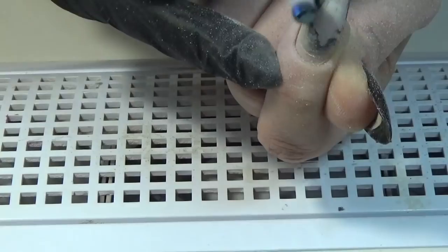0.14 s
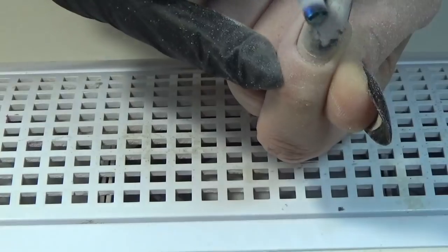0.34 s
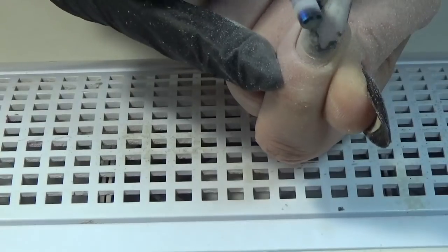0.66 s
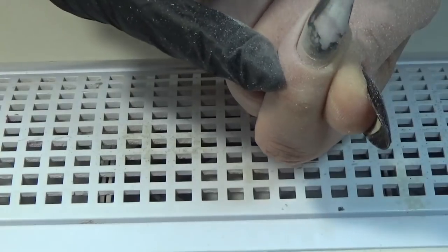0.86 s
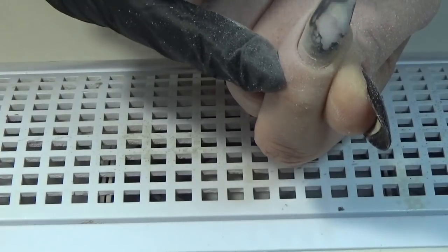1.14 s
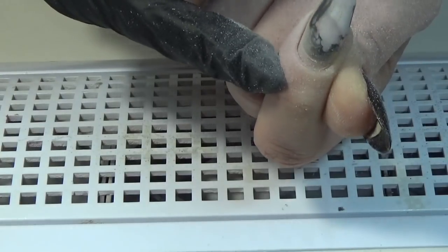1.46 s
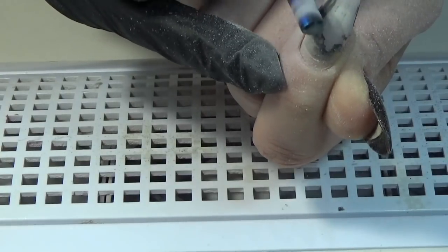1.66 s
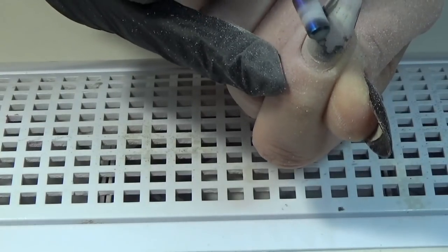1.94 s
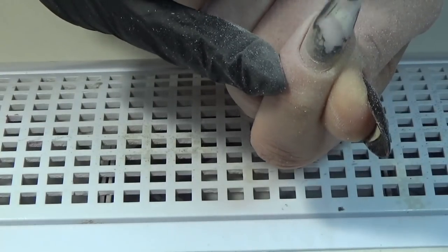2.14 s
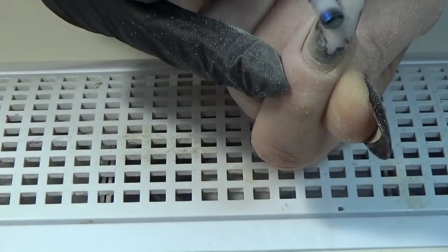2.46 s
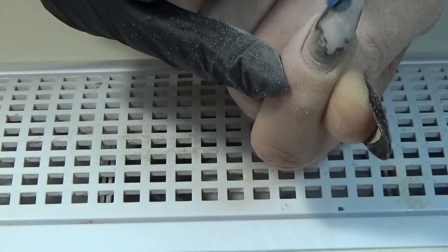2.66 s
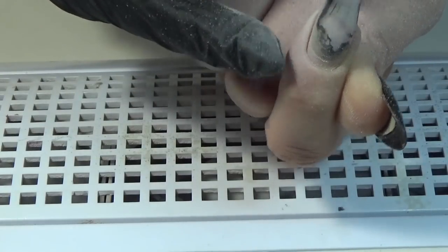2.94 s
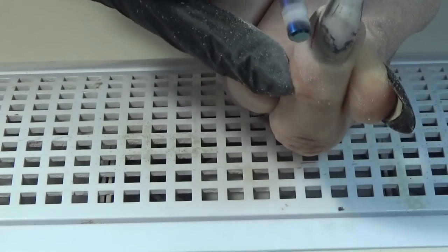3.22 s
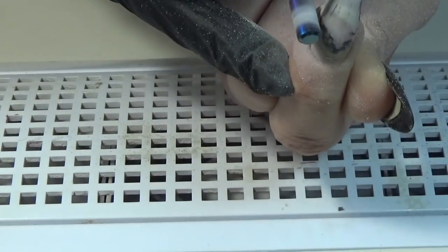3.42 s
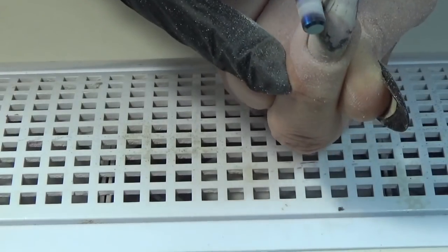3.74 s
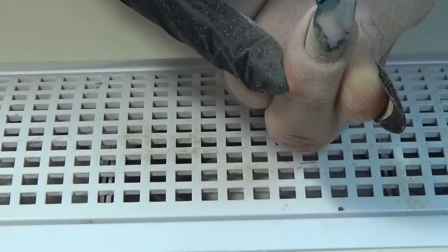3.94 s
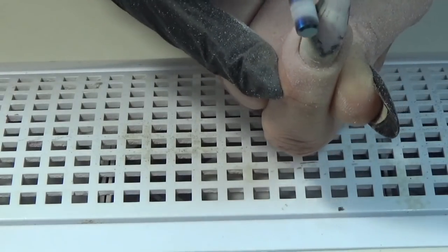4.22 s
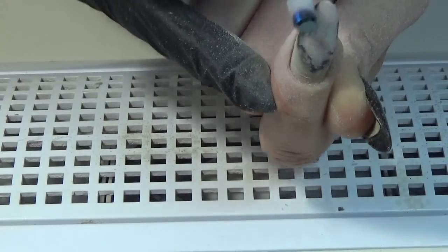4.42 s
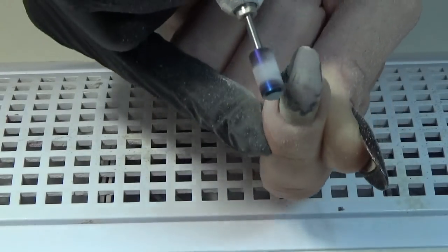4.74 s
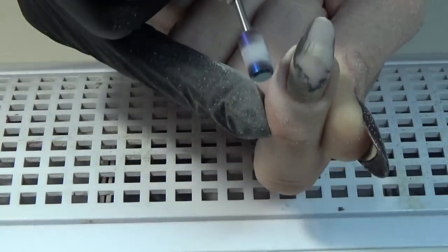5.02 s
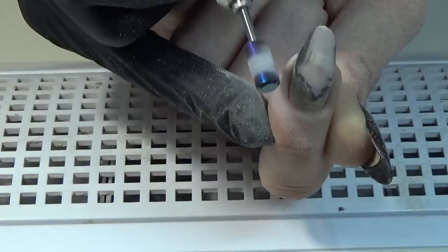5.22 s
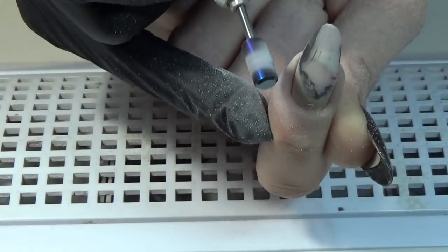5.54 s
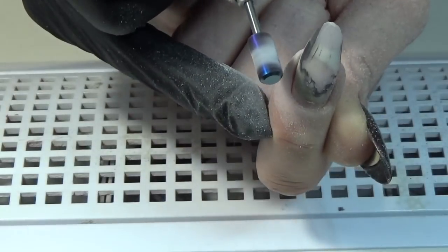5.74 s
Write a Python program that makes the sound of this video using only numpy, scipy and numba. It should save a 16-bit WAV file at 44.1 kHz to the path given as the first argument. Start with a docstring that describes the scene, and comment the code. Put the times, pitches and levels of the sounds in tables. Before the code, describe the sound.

A handheld nail drill runs continuously near the microphone, with a piercing whine around five to six kilohertz and sizzling bearing noise. Quick gritty buzzes come and go as the bit touches the nail, each pulling the pitch down and dulling the whine. After the last light touches only free-running whine and hiss remain, over constant fan air in a small, dry indoor space.

```python
"""A piercing whine and a bright hiss, broken by short buzzing strokes: an electric nail drill close to the
microphone, turning about 550 times a second above a small dust extractor.
The motor whines at ten times the shaft rate; the bearings hiss through the resonances of the handpiece.
In each stroke the bit bites the nail once a turn and drags the motor down; later the drill is lifted, turns
away and speeds up. The recorder's gain control ducks under the hardest strokes."""
import sys
import numpy as np
from scipy import signal
from scipy.fft import rfft, irfft
from scipy.io import wavfile
from scipy.ndimage import uniform_filter1d
from numba import njit

SR = 44100
rng = np.random.default_rng(int(sys.argv[2]) if len(sys.argv) > 2 else 0)


def to_wav(sig):
    """Store sig (one row per channel, or 1-D mono) as 16-bit WAV at the path in sys.argv[1].

    Samples outside -1..1 are clipped; the rate is SR.
    """
    pcm = np.clip(np.atleast_2d(sig), -1, 1) * 32767
    pcm = np.round(pcm).astype(np.int16)
    wavfile.write(sys.argv[1], SR, pcm.T)  # frames by channels


N = 258867
TIME = np.arange(N) / SR  # s
FREQS = np.maximum(np.fft.rfftfreq(N, 1 / SR), 1)  # Hz, kept above zero for logarithms and division

# Air rushing through the extractor, below the drill: f/Hz, relative density level/dB
AIR_SPECTRUM = [(25, -33), (70, -28), (115, -14), (165, -7), (195, -10.5), (290, 1), (420, -8), (620, -8),
                (1000, -5), (1200, -6), (1400, -10), (2300, -10.5), (5000, -11), (11000, -24)]
# Resonances of the extractor's box and grille: f/Hz, width/Hz, relative level/dB
BOX_RESONANCES = [(500, 72, -4), (750, 24, -1.5), (970, 34, -11.5), (1077, 97, -6)]
# Hum of the fan motor and blades: f/Hz, level/dB
FAN_LINES = [(48.4, -68.5), (339.1, -45.5), (376.8, -51.5), (753.7, -56.5), (1550, -48.5), (1599, -54)]
# Difference between the sides, from reflections around the microphone: f/Hz, side-minus-mid level/dB
STEREO_WIDTH = [(60, -10), (110, -13), (190, -17.5), (340, -16), (600, -12), (1060, -11), (1900, -10.5),
                (3350, -11.5), (6000, -14.5), (10600, -11.5)]
# Resonances of the handpiece held at the nail: f/Hz, width/Hz, relative level/dB
CASE_AT_NAIL = [(1763, 340, -6), (2905, 630, -2), (3260, 210, -3.5), (4426, 540, 2.5), (5520, 400, 5.5),
                (6400, 550, 1), (7790, 970, 1.5), (9520, 740, -6), (10790, 153, -2)]
# Resonances of the handpiece turned away: f/Hz, width/Hz, relative level/dB
CASE_TURNED = [(1797.6, 343, -6.5), (2715, 394, 0), (3490, 260, -0.5), (4120, 1000, -3), (5000, 410, 6.5),
               (6160, 780, 3), (7940, 1160, 0.5), (9850, 1400, -6.5), (10200, 770, -10)]
# Hold of the handpiece, at the nail and then lifted:
# t/s, turned away from the nail (0-1), bearing hiss level/dB, second whistle level/dB
HOLD = [(0, 0.03, -21.8, -34), (2.9, 0.13, -21.9, -39), (3.23, 0.06, -21.2, -29), (3.5, 0.03, -21.8, -34),
        (4.5, 0.1, -21.1, -33), (4.68, 1, -20, -35), (4.88, 0.95, -20, -33), (5.35, 1, -20, -53),
        (5.7, 0.83, -19.5, -29), (5.87, 0.6, -19, -31)]
# Hum of the shaft: t/s, level/dB
SHAFT_HUM = [(0, -35), (.4, -43), (1.1, -38), (1.3, -43.5), (1.55, -36.5), (2.0, -40), (2.75, -36.5),
             (3.1, -42), (3.6, -39.5), (3.8, -50), (4.15, -41.5), (5.15, -45), (5.5, -39.5)]
# Overtones of the motor: multiple of the shaft rate, level/dB at the nail, level/dB turned away
OVERTONES = [(3, -50.5, -43), (4, -49.5, -44.5), (5, -42.5, -44), (6, -54, -42.5), (7, -43, -35.5),
             (8, -41, -43), (9, -52, -33), (12, -40, -39), (13, -40, -36), (18, -48, -51)]
# Brief fades and swells of the whine as the tool moves: peak t/s, half-width/s, change of level/dB
WHINE_SWINGS = [(1.235, .045, -8), (2.56, .3, -1.8), (4.59, .045, -19), (4.89, .06, 3.2), (5.11, .125, -16),
                (5.75, .15, -12.5)]
# Strokes of the bit on the nail: start t/s, hardest t/s, end t/s, drag on the motor/Hz,
# buzz level/dB, buzz tilt/(dB per octave), top-octave shriek level/dB
STROKES = [(-0.1, 0.029, 0.112, 67.3, -32.5, 0.0, -17.0), (0.303, 0.433, 0.566, 109.5, -28.0, -2.0, -14.5),
           (0.721, 0.806, 0.918, 104.5, -27.5, 0.0, -13.5),
           (1.075, 1.147, 1.278, 142.0, -26.0, -2.0, -12.5),
           (1.403, 1.443, 1.511, 105.7, -28.0, -1.0, -13.5),
           (1.916, 2.112, 2.262, 101.7, -25.5, -2.5, -10.5), (2.436, 2.546, 2.675, 92.8, -24.5, 1.0, -12.0),
           (2.794, 2.815, 2.88, 54.3, -27.5, 4.0, -14.0), (3.583, 3.893, 4.041, 97.4, -35.0, -4.0, -19.0),
           (4.229, 4.323, 4.418, 99.4, -33.0, -4.0, -22.0), (4.514, 4.602, 4.737, 32.9, -44.0, -3.0, -30.0)]
# Ring of bit and nail under the bites: f/Hz, relative level/dB
NAIL_RING = [(550, -18), (2200, -27), (3300, -15), (3850, -6), (4400, -4.5), (5000, -18), (5500, -3),
             (6000, -3), (6600, 2), (7150, 1), (7700, -23), (8250, 0.5), (9300, -1), (9850, -1),
             (10400, -2.5), (11000, -6)]

AIR_DB = -29.5
FREE_HZ, START_HZ = 576.4, 546.9  # shaft rate when running free, and at the start
INERTIA_S = 0.556  # time constant with which the motor follows a change of load
WHINE_DB = -16.5  # whine when running free at the nail
WHINE_DB_PER_HZ = 0.135  # loss for each Hz that the motor slows
WHINE_TURNED_DB = -2.4  # change with the tool turned fully away
WHISTLE_DAMPED_DB = 5  # a full press on the nail damps the second whistle by this much
BITE_POWER = 1.4  # the buzz grows faster than the pressure
SHRIEK_LAG_S = 0.018  # the highest sounds of a stroke peak this much later
TOP_HZ = 11130  # upper limit of the recorder's band


def undb(db):
    """Decibels to gain."""
    return 10 ** (np.asarray(db) / 20)


def unit(x):
    """Scale to rms 1."""
    return x / np.sqrt(np.mean(x ** 2))


def curves(table):
    """The columns of a time table, interpolated at every sample."""
    times, *columns = np.transpose(table)
    return [np.interp(TIME, times, column) for column in columns]


def colour(points, hz):
    """Gain of a spectrum of (Hz, dB) points, interpolated over log frequency."""
    f, db = np.transpose(points)
    return undb(np.interp(np.log(hz), np.log(f), db))


def resonances(modes):
    """Gain of a set of steep-sided resonances whose powers add."""
    power = 0
    for hz, width, db in modes:
        detuning = (FREQS ** 2 - hz ** 2) / (FREQS * width * np.pi / 2)
        power = power + (undb(db) / (1 + detuning ** 2)) ** 2
    return np.sqrt(power)


def walk(rate):
    """Smooth random wander of rms 1 that changes about rate times a second."""
    spectrum = rfft(rng.standard_normal(N)) / (1 + (FREQS / rate) ** 4)
    return unit(irfft(spectrum, N))


def pan(db):
    """Left and right gains for a left-minus-right level."""
    return undb(np.array([[.5], [-.5]]) * db)


def noise(direct, reflected):
    """Stereo noise from two spectra: the direct sound, and reflections that make the sides differ."""
    mid, side = rfft(rng.standard_normal((2, N)))
    mid = mid * direct
    side = side * reflected * colour(STEREO_WIDTH, FREQS)
    return unit(irfft(np.array([mid + side, mid - side]), N))


def tone(phase, waver_db, waver_hz, side_db):
    """A stereo line whose level wavers, with a weak reflection that drifts between the sides."""
    direct = undb(waver_db * walk(waver_hz)) * np.sin(phase)
    reflected = undb(side_db) * np.sin(phase + np.pi * walk(2.4))
    return np.sqrt(2) * (direct + reflected * np.array([[1], [-1]]))


def extractor():
    """Nearly steady air noise shaped by the box and grille, with the wavering hum of the fan."""
    spectrum = np.hypot(colour(AIR_SPECTRUM, FREQS), resonances(BOX_RESONANCES))
    hum = 0
    for hz, db in FAN_LINES:
        phase = 2 * np.pi * hz * TIME + .4 * walk(4.8)
        hum = hum + undb(db) * tone(phase, waver_db=2, waver_hz=3.4, side_db=-26)
    return undb(AIR_DB + 0.81 * walk(18)) * noise(spectrum, spectrum) + hum


def pressure(stroke, lag_s=0):
    """One stroke, 0-1: the hand presses up to its hardest moment and eases off."""
    return np.interp(TIME - lag_s, stroke[:3], [0, 1, 0])


def press(levels_db, lag_s):
    """Gain of the sound of all strokes, each rising with pressure to its own level."""
    return sum(undb(db) * pressure(stroke, lag_s) ** BITE_POWER for stroke, db in zip(STROKES, levels_db))


def speed():
    """Turns a second: each stroke drags the motor down, and it creeps back towards its free speed."""
    drag_hz = sum(stroke[3] * pressure(stroke) for stroke in STROKES)
    step = 1 / (INERTIA_S * SR)
    sag_hz, _ = signal.lfilter([step], [1, step - 1], drag_hz, zi=[FREE_HZ - START_HZ])
    return FREE_HZ - sag_hz


def bearings(shaft, turned, hiss_db):
    """Rolling hiss rings the handpiece and swells twice a turn; turning the tool shows other resonances."""
    front, back = resonances(CASE_AT_NAIL), resonances(CASE_TURNED)
    all_round = np.sqrt((front ** 2 + back ** 2) / 2)  # the room hears the tool from every side
    at_nail = noise(front, all_round) * pan(.2)
    away = noise(back, all_round) * pan(0.44)
    hiss = np.sqrt(1 - turned) * at_nail + np.sqrt(turned) * away
    swell = 1 + 0.25 * np.sin(2 * shaft + 1.7 * walk(49))
    flutter_db = 0.47 * walk(27) + 0.63 * walk(300)
    return undb(hiss_db + flutter_db) * swell * hiss


def whine_level(hz, turned):
    """In dB: the whine weakens as the motor slows or turns away, and now and then fades or swells."""
    swings_db = sum(db * np.exp(-((TIME - peak_s) / width_s) ** 2) for peak_s, width_s, db in WHINE_SWINGS)
    return WHINE_DB - WHINE_DB_PER_HZ * (FREE_HZ - hz) + WHINE_TURNED_DB * turned + swings_db


def motor(shaft, hz, turned, whistle_db):
    """Lines locked to the shaft: its hum, a tenfold whine roughened by bearing play, a whistle, overtones."""
    rough_phase = 10 * shaft + .09 * walk(170)
    whine_db = whine_level(hz, turned) + 0.35 * walk(150)
    whine = undb(whine_db) * tone(rough_phase, waver_db=0.94, waver_hz=21, side_db=-22)
    out = whine * pan(2.6 * turned - .1)  # turning the tool aims the whine to the left

    hum_db, = curves(SHAFT_HUM)
    out += undb(hum_db) * tone(shaft, waver_db=1.55, waver_hz=11, side_db=-13.5)

    damped_db = WHISTLE_DAMPED_DB * sum(pressure(stroke) for stroke in STROKES)
    whistle_phase = 14 * shaft + 0.23 * walk(60)
    out += undb(whistle_db - damped_db) * tone(whistle_phase, waver_db=2.7, waver_hz=22, side_db=-25)

    for multiple, at_nail_db, away_db in OVERTONES:
        db = at_nail_db + turned * (away_db - at_nail_db)
        phase = round(multiple) * shaft + 0.39 * walk(30)
        out += undb(db) * tone(phase, waver_db=3.0, waver_hz=22, side_db=-22)
    return out


def sanding(shaft, hz):
    """The bit bites once a turn: shaft harmonics ring the nail, tilted stroke by stroke, under a shriek."""
    _, hardest_s, _, _, buzz_db, tilt_db, shriek_db = np.transpose(STROKES)
    early, late = press(buzz_db, 0), press(buzz_db, SHRIEK_LAG_S)
    tilt_db = np.interp(TIME, hardest_s, tilt_db)
    bite = shaft + 0.015 * walk(84)  # each bite lands slightly early or late
    buzz = 0
    for k in range(1, 21):
        octaves = np.clip(np.log2(k * hz / 7000), -.5, 1)  # the tilt pivots at 7 kHz
        lateness = np.clip(octaves / 0.68, 0, 1)  # the highest harmonics peak last
        force = early + lateness * (late - early)
        level = force * colour(NAIL_RING, k * hz) * undb(tilt_db * octaves + 3 * walk(20))
        smear = 2 * np.pi * rng.random()  # the ringing nail spreads each bite over the whole turn
        buzz = buzz + level * np.cos(k * bite + smear)
    # the grit shrieks above the recorder's band, where it still works the gain control
    top_octave = np.exp(-((FREQS - 15000) / 1500) ** 2)
    shriek = press(shriek_db, SHRIEK_LAG_S) * noise(top_octave, 0)
    return buzz * pan(-1.6) + shriek


def scene():
    """One shaft drives whine, hiss and buzz close to the microphone; the extractor runs underneath."""
    hz = speed()
    shaft = 2 * np.pi * np.cumsum(hz) / SR  # shaft angle in radians
    turned, hiss_db, whistle_db = curves(HOLD)
    turned = np.clip(turned, 0, 1)
    background = extractor() + bearings(shaft, turned, hiss_db)
    return background + motor(shaft, hz, turned, whistle_db) + sanding(shaft, hz)


@njit
def follow(power, attack, release):
    """Envelope that rises quickly and falls slowly."""
    out, e = np.empty(len(power)), power[:2000].mean()
    for i in range(len(power)):
        e += (power[i] - e) * (attack if power[i] > e else release)
        out[i] = e
    return out


def gain_control(x, threshold_db, slope, attack_s, release_s):
    """Turn both sides down together while their level is over the threshold."""
    power = uniform_filter1d(np.mean(x ** 2, axis=0), size=256)
    envelope = follow(power, 1 / (attack_s * SR), 1 / (release_s * SR))
    level_db = 10 * np.log10(envelope)
    return x * undb(-slope * np.maximum(level_db - threshold_db, 0))


def record(dry):
    """The recorder behind the microphone: gain control, then a steep cut of the top."""
    held = gain_control(dry, threshold_db=-14.5, slope=0.84, attack_s=0.0062, release_s=0.052)
    low_pass = signal.firwin(1201, TOP_HZ, window=("kaiser", 9), fs=SR)
    return signal.fftconvolve(held, low_pass[None], mode="same", axes=1)


dry = scene()
out = record(dry)
to_wav(out)
```